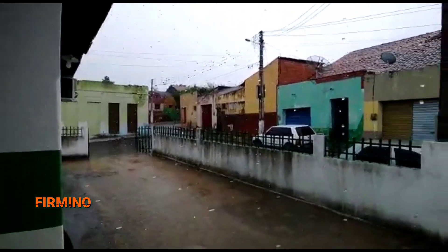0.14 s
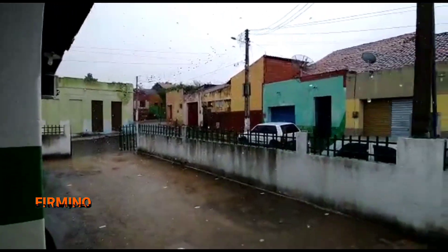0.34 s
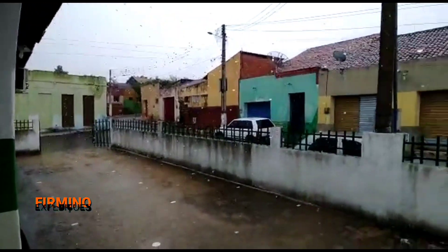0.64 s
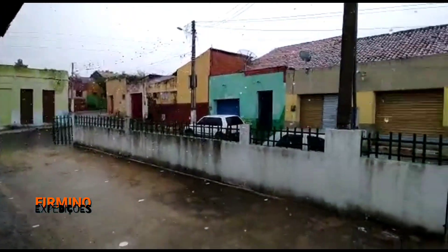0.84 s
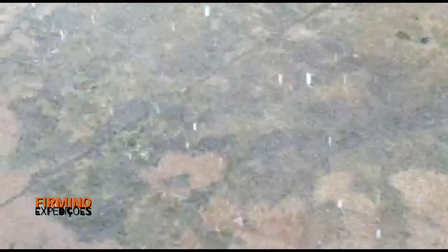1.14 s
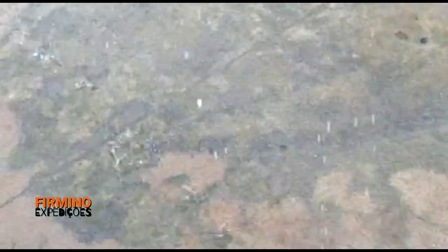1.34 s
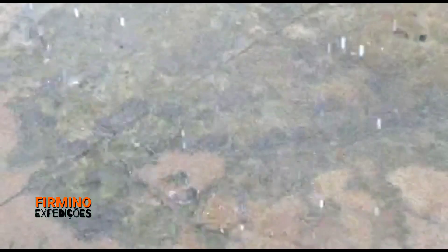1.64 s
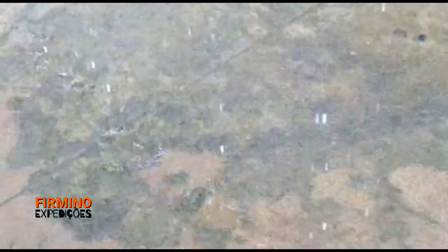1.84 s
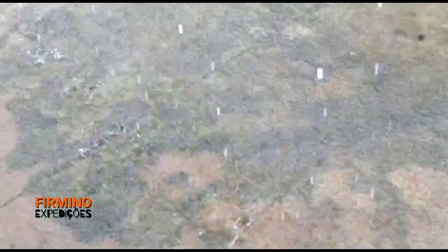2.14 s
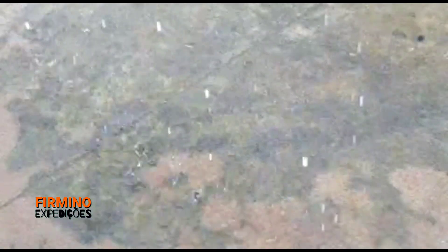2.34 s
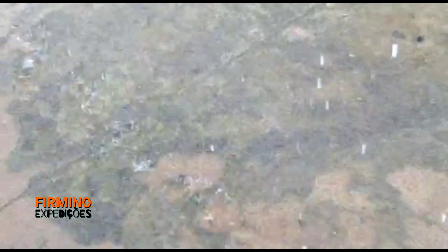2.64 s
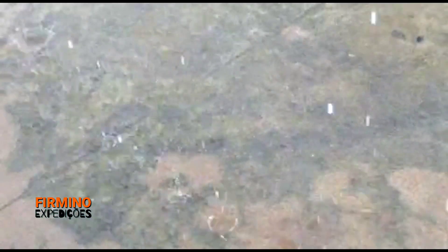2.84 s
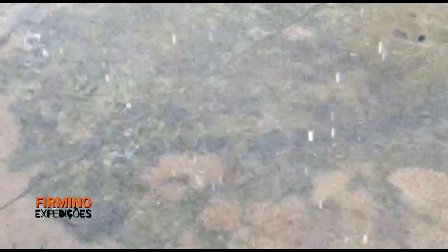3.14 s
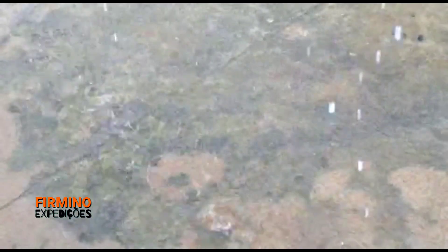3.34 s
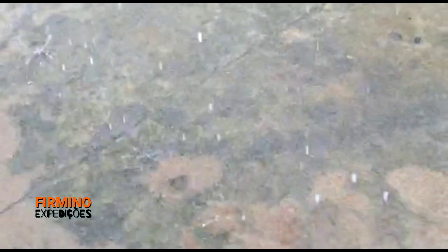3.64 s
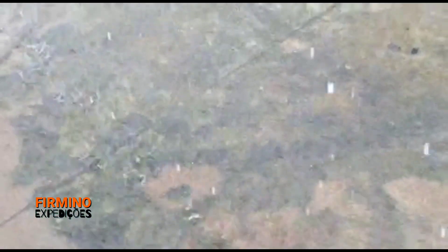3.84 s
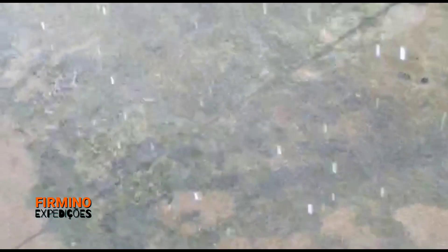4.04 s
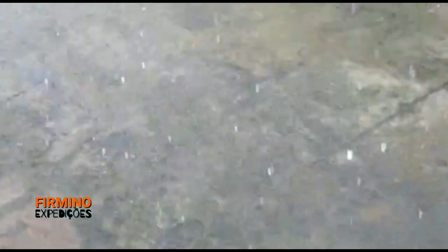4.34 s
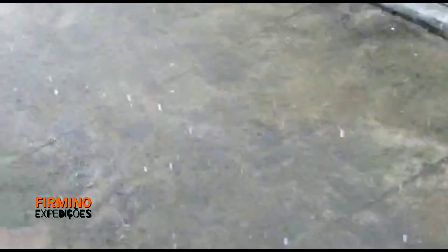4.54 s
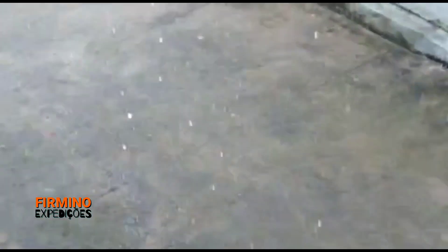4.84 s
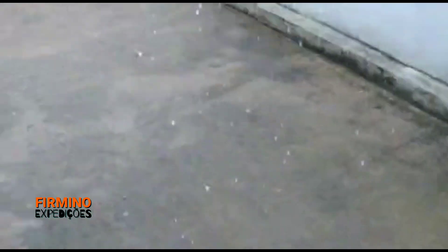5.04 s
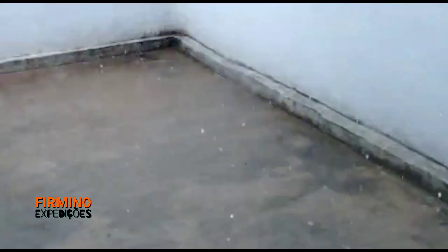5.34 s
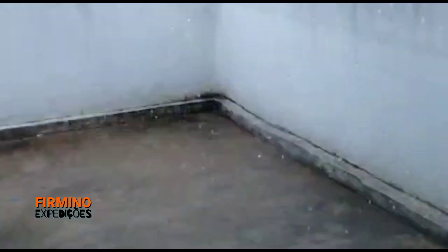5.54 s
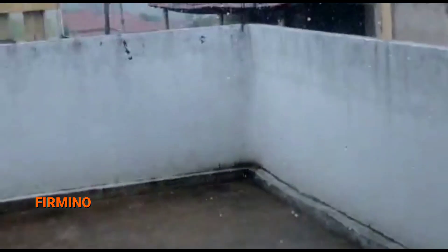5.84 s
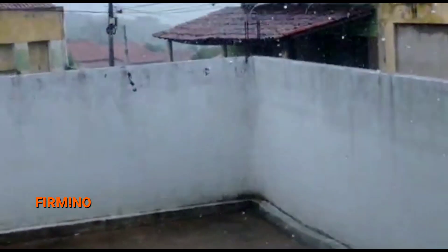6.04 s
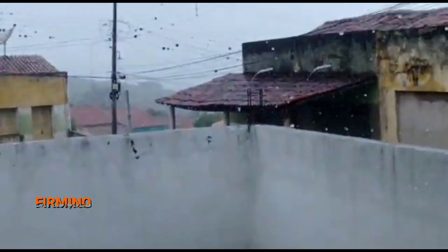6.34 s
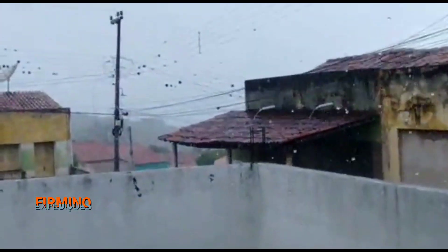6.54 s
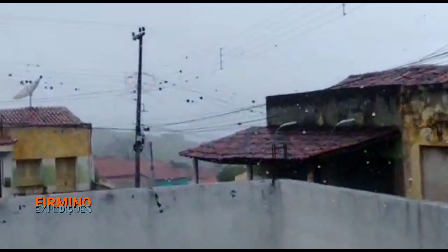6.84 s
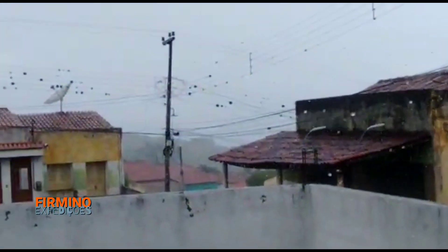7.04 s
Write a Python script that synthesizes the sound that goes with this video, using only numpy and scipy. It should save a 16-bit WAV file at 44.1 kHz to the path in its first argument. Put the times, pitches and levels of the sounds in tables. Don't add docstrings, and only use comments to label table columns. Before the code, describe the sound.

Continuous dense downpour in a small-town yard, captured close by a phone under a porch. The rain begins slightly thinner with sharp ticks, grows fuller and splashier when the phone points at the wet floor after about a second, then changes colour again towards a wall near the end. Splats, spray bursts, short gutter gushes and soft puddle drips stand out; very little echo, little bass.

```python
import sys
import numpy as np
from scipy import signal
from scipy.fft import rfft, irfft, next_fast_len
from scipy.io import wavfile
from scipy.ndimage import uniform_filter1d

SR = 44100
rng = np.random.default_rng(int(sys.argv[2]) if len(sys.argv) > 2 else 0)


def volts_from_decibels(level):
    exponent = np.asarray(level, float) / 20
    return 10 ** exponent


def master(y):
    cut = np.clip(np.atleast_2d(y).T, -1, 1)
    pcm = np.round(cut * 32767)
    wavfile.write(sys.argv[1], SR, pcm.astype(np.int16))


N = 317065

# (time [s], level [dB])
RAIN_STRENGTH = [(0.0, -38), (0.02, -40), (0.04, -37), (0.6, -37), (0.62, -32), (0.82, -35), (0.96, -35),
                 (1.2, -35.5), (1.44, -32.5), (1.9, -33), (2.1, -32), (4.2, -32), (4.48, -31),
                 (4.85, -32.5), (4.89, -34), (4.97, -31.5), (7.03, -29.5), (7.19, -31.5)]
RAIN_MEAN_DB = -32
LAYER_EDGES_HZ = (40, 1200, 5500, 11000, 15000)
# (facing street [dB], facing floor [dB], facing wall [dB], follow [0-1])
RAIN_LAYERS = [
    (-17, -18.5, -18, 0.35),
    (-8, -4.5, -6, 0.74),
    (-2, -2, -2.5, 1),
    (-16.5, -15.5, -16, 0.99),
]
# (time [s], lift
# [dB], length [s], centre [Hz])
RAIN_SWELLS = [(0.017, 10, .02, 8000), (0.526, 3.5, 0.073, 6000), (0.743, -1, 0.16, 9000),
               (.99, 3, 0.031, 6000), (1.16, -5, 0.033, 8000), (1.09, 0, 0.013, 9000),
               (1.21, -3.5, 0.037, 6100), (1.434, 3, 0.037, 7000), (1.63, 2.5, 0.045, 9000),
               (1.89, -2.5, 0.085, 5000), (2.115, 2, 0.05, 7000), (6.575, 1.5, 0.028, 8500),
               (6.655, -3, 0.024, 7000), (3.054, 2, .05, 8000), (3.104, 1.5, 0.055, 6000),
               (3.75, -4.5, 0.043, 4860), (3.898, 3, 0.23, 845), (4.26, -2, .05, 6000),
               (4.553, 4, 0.062, 2000), (4.862, 0, .02, 6000), (4.905, 6.5, 0.048, 7200),
               (5.02, 3, .05, 5000), (5.16, -2.5, 0.1, 5500), (5.54, -4, 0.058, 4500),
               (5.62, 1.5, 0.027, 5000), (5.726, -4, 0.057, 5000), (5.766, 4.5, 0.056, 12000),
               (5.824, 1, .05, 5000), (5.956, 2, 0.032, 850), (7.18, 4.5, .08, 8000)]
# (time [s], peak [dB])
STREET_DROPS = [(.1027, -20), (.1276, -20), (.1915, -25), (.3267, -17), (.4145, -24), (.4793, -22),
                (.5237, -19), (.5766, -25), (.607, -23), (.618, -17), (.6355, -18), (.6604, -18),
                (.7976, -24), (.8634, -23), (.9148, -20), (.9363, -20), (.9667, -19), (1.0789, -23),
                (1.0864, -22), (1.0949, -21), (1.1303, -28), (1.2436, -28), (1.2501, -22)]
# (time [s], peak [dB])
YARD_DROPS = [(1.5663, -21), (1.6097, -21), (2.2807, -23), (2.3506, -19), (2.7217, -19), (3.3493, -22),
              (3.487, -21), (3.7748, -16), (4.0916, -23), (4.2916, -24), (4.6294, -22), (4.8693, -15),
              (5.6675, -18), (5.7359, -23), (6.3031, -21), (6.3629, -21), (6.6687, -19), (7.0544, -19),
              (7.1412, -19)]
# (time [s], peak [dB], centre [Hz])
EAVES_GOBS = [(.634, -28, 4990), (.9444, -28, 4000), (1.0211, -22, 4440), (1.3379, -27, 3790),
              (1.4157, -21, 2410), (1.5269, -22, 2820), (1.6112, -22, 4030), (1.8986, -22, 4070),
              (1.71, -18, 3770), (2.345, -14, 5800), (2.4279, -18, 3580), (2.6728, -25, 2850),
              (6.635, -28, 1600), (2.7861, -28, 4120), (6.79, -21, 2150), (3.1507, -27, 3600),
              (3.3443, -20, 4250), (3.3827, -18, 3700), (3.5623, -14.5, 4030), (3.9973, -18.5, 2200),
              (4.3665, -19, 2340), (4.4209, -17, 2500), (4.5394, -28, 2400), (4.9894, -25, 4760),
              (5.0644, -23, 2200), (5.3094, -20, 4200), (5.3644, -18, 2200), (5.5994, -21, 2540),
              (6.0894, -20.5, 2230), (6.2123, -21, 3200)]
# (time [s], peak [dB], centre [Hz])
STONE_SMACKS = [
    (.7981, -23, 3630),
    (.915, -15.5, 3720),
    (2.738, -17.5, 3430),
    (4.8695, -14, 4560),
    (5.822, -22, 2150),
    (6.6687, -19, 5250),
]
# (time [s], peak [dB], centre [Hz])
SPRAY_BURSTS = [
    (.3267, -16.5, 9100),
    (.9667, -14, 9100),
    (1.4094, -24, 7910),
    (2.2024, -15, 6090),
    (2.3344, -29, 6560),
    (4.8693, -9, 8300),
    (4.8844, -31, 8450),
    (5.7494, -22, 9270),
    (7.0544, -17, 9460),
]
# (time [s], peak [dB], centre [Hz])
GUTTER_GUSHES = [
    (.934, -21, 4270),
    (1.0, -27, 1990),
    (1.64, -21.5, 2800),
    (2.075, -17.5, 3500),
    (2.15, -21, 3500),
    (2.315, -13, 5230),
    (2.74, -16, 3140),
    (2.967, -16, 2980),
    (4.875, -22, 5000),
    (7.06, -22.5, 4330),
]
# (time [s], peak [dB], pitch [Hz])
PUDDLE_DRIPS = [(.377, -41, 493), (1.883, -35, 1220), (3.519, -39, 345), (3.859, -41, 501),
                (3.909, -42, 401), (4.936, -38, 614), (5.066, -33.5, 940), (5.178, -36, 600),
                (5.266, -39, 619), (5.44, -38, 616), (5.465, -29.5, 625), (5.662, -34, 680),
                (5.7, -46, 590), (5.969, -43, 638)]
# (frequency [Hz], level [dB])
LEFT_COLOUR = [(30, -27), (65, -17), (88, -5.5), (100, -10.5), (120, -8), (200, -11), (400, -7.5),
               (800, -7.5), (1300, -2.5), (3500, 0.3), (10500, 0), (13000, -3.5), (15000, 4), (15250, -8.5)]
RIGHT_COLOUR = [(30, -38), (65, -20.5), (88, -11), (100, -10.5), (120, -11.5), (200, -12), (600, -11.5),
                (1300, -9), (2600, -7.5), (5500, -2.5), (10500, -5.5), (13000, -1), (15000, -1),
                (15250, -7)]
# (centre [Hz], width [Hz], facing street [dB], facing floor [dB], facing wall [dB])
LEFT_RESONANCES = [(1720, 430, 3.5, -0.4, 3.0), (2200, 680, 7.0, 4.0, 4.0), (2896, 150, 1.5, 4.0, 1.0),
                   (3740, 440, 5.0, 4.0, 4.0), (4250, 260, 1.5, 0.3, 7.5), (7040, 380, 0.0, 2.0, 3.0),
                   (7530, 590, -1.0, -3.5, -3.0), (7880, 1120, 2.5, 8.0, -0.5),
                   (9500, 1500, -3.5, 1.0, -4.0), (8600, 4200, 9.5, 0.0, 11.5),
                   (11200, 500, 0.5, -2.3, -2.5),
                   (14750, 500, 8.0, 12.0, 10.0)][:11] + [(2230, 57, -7, 3.2, 6.5),
                   (4070, 150, -2, 2.5, -13), (630, 66, 0.5, 0.3, 6.0)]
RIGHT_RESONANCES = [(725, 190, 3, 0.5, 5), (1630, 72, 8, -9, 5), (2200, 450, 4, 1, 5),
                    (2850, 800, 4.5, 4.5, 3), (4100, 390, 3, 0.5, 4), (5850, 650, -3, -7, -2),
                    (7180, 450, 3, 2, 6), (7900, 470, 1, -5, -3), (9320, 290, -1, -0.5, 5),
                    (9500, 520, 7, 5.5, 7), (11100, 500, 5.5, 0.5, 4), (3180, 9100, 1.5, 0.5, 1.4)]
# (frequency [Hz], likeness [0-1])
PORT_LIKENESS = [(60, 1), (130, 0.83), (290, 0.88), (640, 0.25), (1410, 0.01), (3100, 0.01), (6820, 0),
                 (15000, 0.0)]
# (time [s], aim [0 street, 1 floor, 2 wall])
PHONE_AIM = [
    (0, 0),
    (1.22, 0),
    (1.27, 1),
    (5.5, 1),
    (5.9, 2),
]
SIZE = next_fast_len(N + 8192)
HZ = np.maximum(np.arange(SIZE // 2 + 1) * SR / SIZE, 1.)
STEPS = np.arange(0, N + 64, 64) / SR
PORT_HZ = np.maximum(np.arange(4097) * SR / 8192, 1.)


def on_log(table, at_hz=HZ):
    hz, value = np.transpose(table)
    return np.interp(np.log(at_hz), np.log(hz), value)


def unit(x):
    return x / np.sqrt(np.mean(x ** 2, axis=-1, keepdims=True))


def port_db(broad, resonances, aim):
    colour = on_log(broad, PORT_HZ)
    for mode in resonances:
        centre_hz, width_hz = mode[:2]
        colour = colour + mode[2 + aim] / (1 + (2 * (PORT_HZ - centre_hz) / width_hz) ** 2)
    return colour


def causal(db):
    cep = irfft(db * np.log(10) / 20)
    cep[1:4096] *= 2
    cep[4097:] = 0
    return irfft(np.exp(rfft(cep)))[:6000]


def porch(x, t60_s, wet_db):
    t = np.arange(4096) / SR
    tail = volts_from_decibels(wet_db) * rng.standard_normal((2, len(t))) * volts_from_decibels(-60 * t / t60_s)
    tail[:, 0] = 1
    return signal.fftconvolve(x, tail, axes=1)[:, :N]


def burst(events, rise_s, t60_s, width, rough_db, gain_db, alike):
    out, t = np.zeros((2, N + 4096)), np.arange(4096) / SR
    for s, db, hz in events:
        crackle = volts_from_decibels(rough_db * np.repeat(rng.standard_normal(128), 32))
        one, two = rng.standard_normal((2, len(t))) * crackle
        band = signal.butter(2, [hz / width, hz * width], "band", fs=SR, output="sos")
        pair = unit(signal.sosfilt(band, [one, alike * one + (1 - alike) * two]))
        fade = (1 - np.exp(-t / rise_s)) * volts_from_decibels(db + gain_db - 60 * t / t60_s)
        start = int(s * SR)
        out[:, start:start + len(t)] += pair * fade
    return out[:, :N]


def plops():
    return burst(PUDDLE_DRIPS, rise_s=.0021, t60_s=.16, width=1.16, rough_db=2, gain_db=1, alike=.7)


def splats():
    crackle = dict(width=1.22, rough_db=3, gain_db=-10, alike=0)
    gobs = burst(EAVES_GOBS, rise_s=.0034, t60_s=.13, **crackle)
    smacks = burst(STONE_SMACKS, rise_s=.0002, t60_s=.041, **crackle)
    sprays = burst(SPRAY_BURSTS, rise_s=.0022, t60_s=.074, **crackle)
    return gobs + smacks + sprays


def gushes():
    return burst(GUTTER_GUSHES, rise_s=.0043, t60_s=.24, width=1.35, rough_db=3.5, gain_db=-10, alike=0)


def ticks():
    out, t = np.zeros((2, N + 128)), np.arange(96) / SR
    tone_gain = volts_from_decibels(np.array([-15, -3, 3.0, 1]))
    floor_s = PHONE_AIM[2][0]
    for s, db in STREET_DROPS + YARD_DROPS:
        start, chance = int((s + .0006) * SR), rng.random(9)
        ring_hz = np.array([3900, 5600, 8400, 10600]) * (.89 + .26 * chance[:4])
        tones = np.sin(2 * np.pi * (np.outer(ring_hz, t) + chance[4:8, None]))
        click = tone_gain @ tones * np.exp(-t / .00023) * volts_from_decibels(db - .5)
        late = start + int(24 * chance[8])
        right_db = -2 if s < floor_s else -6
        out[0, start:start + len(t)] += click
        out[1, late:late + len(t)] += click * volts_from_decibels(right_db)
    return porch(out[:, :N], t60_s=.045, wet_db=-36)


def drops(count, spread_db, cycles, stray_s):
    when, big, pitch, length, path, phase = rng.random((count, 6, 1)).transpose(1, 0, 2)
    hz = 400 + 15600 * pitch ** 1.5
    life = np.minimum(cycles * (.5 + 9 * length ** 4) * SR / hz, 55)
    size = volts_from_decibels(-spread_db * np.log(1 - .995 * big)) / np.sqrt(life)
    i = np.arange(192, dtype=np.float32)
    rings = size * np.exp(-i / life) * np.sin(2 * np.pi * (hz * i / SR + phase))
    left_start = when * N
    right_start = np.clip(when * N + (path - .5) * stray_s * SR, 0, N)
    ports = []
    for start in (left_start, right_start):
        places = (start + i).astype(int).ravel()
        ports.append(np.bincount(places, rings.ravel(), N + 200)[:N])
    return np.array(ports)


def whiten(spectrum):
    return spectrum * np.sqrt(N / uniform_filter1d(abs(spectrum) ** 2, 4000, axis=1))


def roar_and_patter(alike):
    left, other = rfft(rng.standard_normal((2, N)), SIZE)
    roar = np.array([left, alike * left + np.sqrt(1 - alike ** 2) * other])
    clicks = drops(count=16000, spread_db=3.5, cycles=1.26, stray_s=.002)
    patter = whiten(rfft(porch(clicks, t60_s=.062, wet_db=-22.5), SIZE))
    share = np.clip(on_log([(700, .02), (1800, .12), (3000, .25), (8000, .45), (13000, .3)]), 0, 1)
    return (np.sqrt(1 - share) * roar + np.sqrt(share) * patter).astype(np.complex64)


def layer_levels(colours_db, alike, aim):
    gain = volts_from_decibels(colours_db)
    left, right = gain[:, 0], gain[:, 1]
    heard = (left ** 2 + right ** 2 + 2 * np.interp(PORT_HZ, HZ, alike) * left * right) / 4
    strength_db = np.interp(STEPS, *np.transpose(RAIN_STRENGTH)) - RAIN_MEAN_DB
    levels = []
    for lo, hi, (*aim_db, follow) in zip(LAYER_EDGES_HZ, LAYER_EDGES_HZ[1:], RAIN_LAYERS):
        inside = (PORT_HZ > lo) & (PORT_HZ < hi)
        base_db = 10 * np.log10(heard[:, inside].sum(axis=1) / len(PORT_HZ))
        aimed_db = np.interp(aim, np.arange(3), np.array(aim_db) - base_db)
        levels.append(RAIN_MEAN_DB + follow * strength_db + aimed_db)
    return levels


def walk(rate):
    k = max(int(SR / 64 / rate), 1)
    held = rng.standard_normal(400)[np.arange(len(STEPS)) // k % 400]
    slewed = uniform_filter1d(uniform_filter1d(held, k), k)
    return 1.5 * (slewed - uniform_filter1d(slewed, 230))


def sheets(hz):
    lift_db = 0
    for s, db, long_s, mid_hz in RAIN_SWELLS:
        in_time = (2 * (STEPS - s) / long_s) ** 2 / 2
        in_pitch = (np.log2(hz / mid_hz) / 1.2) ** 2
        lift_db = lift_db + db * np.exp(-in_time - in_pitch)
    return lift_db


def rain(colours_db, aim):
    alike = np.sqrt(np.clip(on_log(PORT_LIKENESS), 0, 1))
    both = roar_and_patter(alike)
    levels = layer_levels(colours_db, alike, aim)
    places = np.clip(np.log2(HZ / 848) * 2, 0, 8)
    out, near = 0, walk(27)
    for k in range(9):
        hz = 848 * 2 ** (k / 2)
        band = np.clip(1 - abs(places - k), 0, 1).astype(np.float32)
        seat = np.interp(np.log(hz), np.log([800, 1700, 4000, 7000, 9600, 13000]), [0, 1, 1, 2, 2, 3])
        low = min(int(seat), 2)
        db = levels[low] + (seat - low) * (levels[low + 1] - levels[low])
        near = .66 * near + .14 * walk(11)
        lively = np.clip(hz / 2500, .25, 1)
        db = db + sheets(hz) + lively * (1.9 * near + .75 * walk(28))
        out = out + np.repeat(volts_from_decibels(db), 64)[:N] * irfft(both * band, SIZE)[:, :N]
    return out


def scene():
    colours_db = np.array([[port_db(LEFT_COLOUR, LEFT_RESONANCES, a),
                            port_db(RIGHT_COLOUR, RIGHT_RESONANCES, a)] for a in range(3)])
    slow_aim = np.interp(STEPS, *np.transpose(PHONE_AIM))
    water = rain(colours_db, slow_aim) + ticks() + splats() + gushes() + plops()
    aim = np.interp(np.arange(N) / SR, *np.transpose(PHONE_AIM))
    out = np.zeros((2, N + 5999))
    for a, pair in enumerate(colours_db):
        share = np.clip(1 - abs(aim - a), 0, 1)
        first, last = np.flatnonzero(share)[[0, -1]]
        ports = np.array([causal(db) for db in pair])
        out[:, first:last + 5999] += signal.fftconvolve((share * water)[:, first:last], ports, axes=1)
    return out[:, :N]


def low_pass(x):
    return signal.sosfilt(signal.butter(12, 16440, fs=SR, output="sos"), x)


def record(dry):
    cut = signal.ellip(12, .3, 80, 15430, fs=SR, output="sos")
    mix = signal.sosfilt(cut, dry)
    return low_pass(mix)


dry = scene()
out = record(dry)
master(out)
```